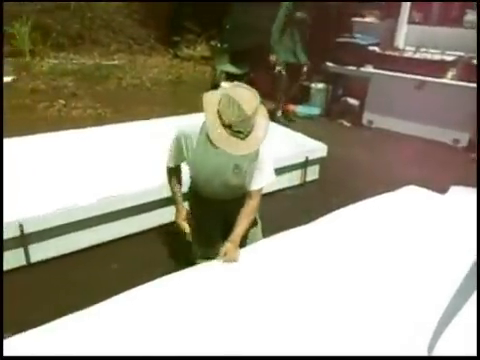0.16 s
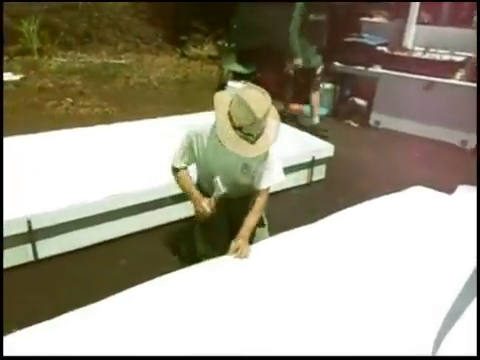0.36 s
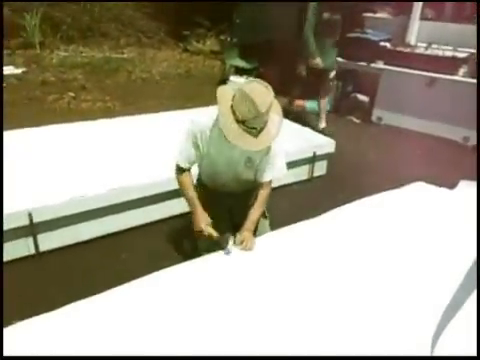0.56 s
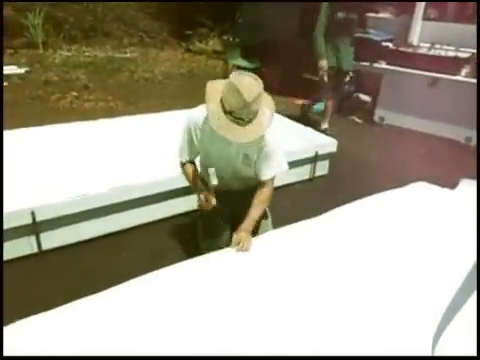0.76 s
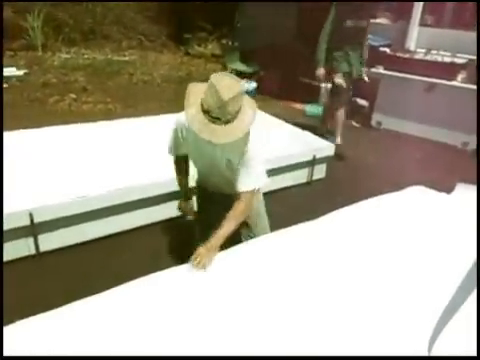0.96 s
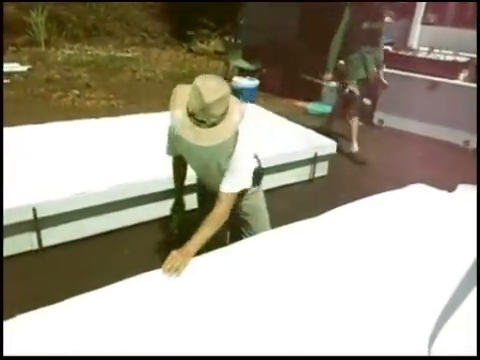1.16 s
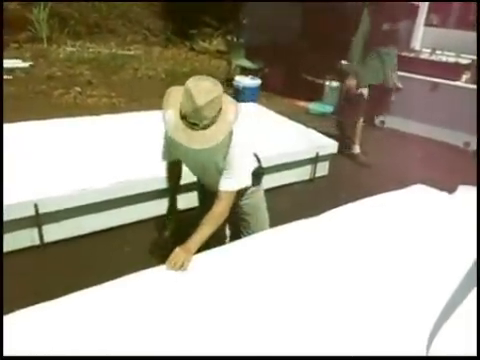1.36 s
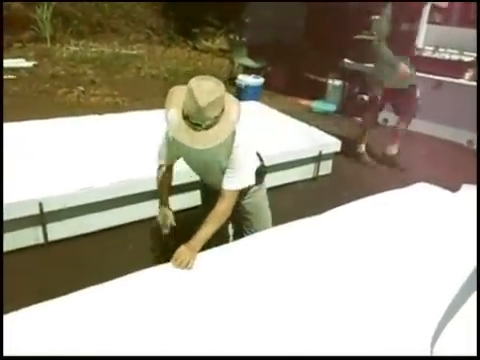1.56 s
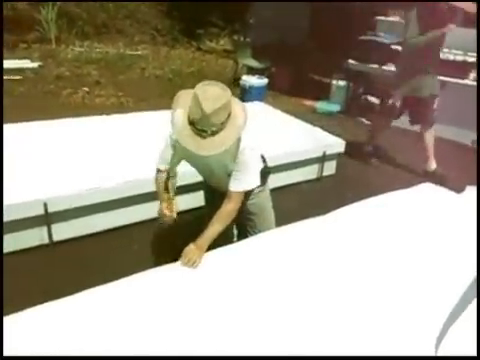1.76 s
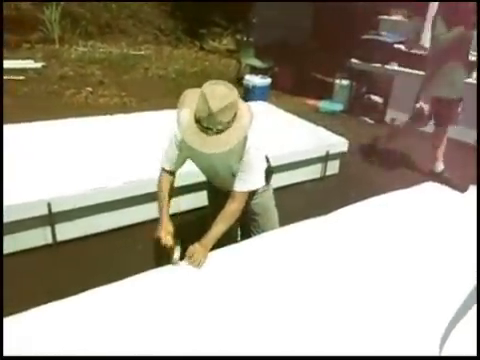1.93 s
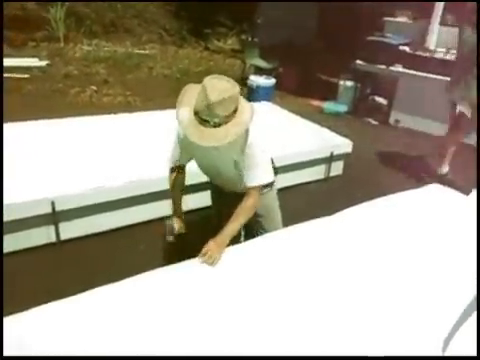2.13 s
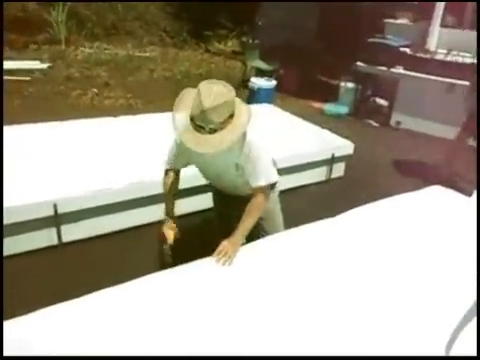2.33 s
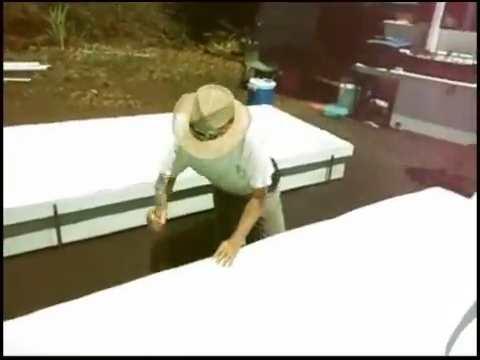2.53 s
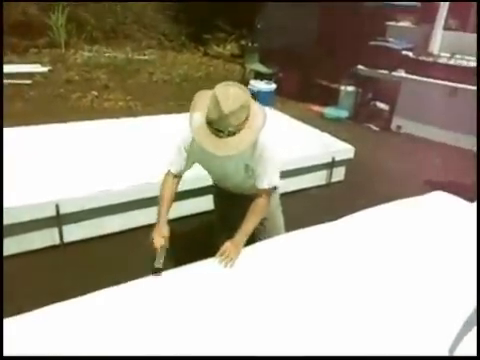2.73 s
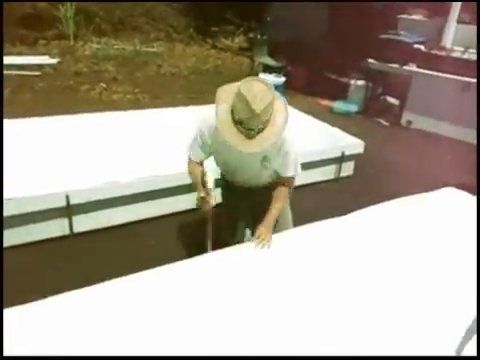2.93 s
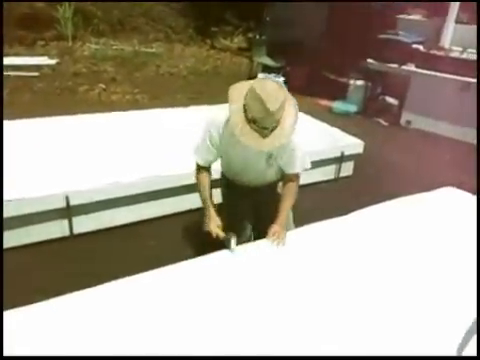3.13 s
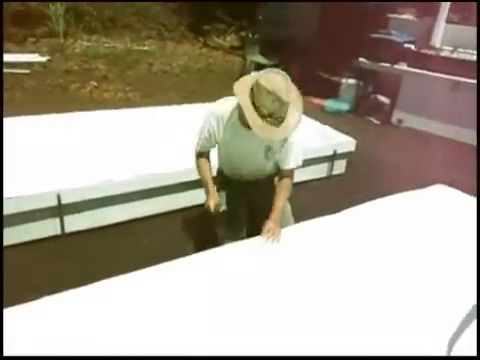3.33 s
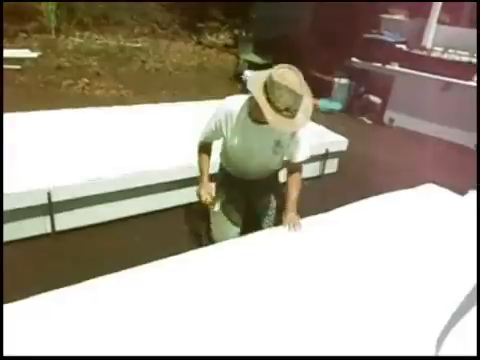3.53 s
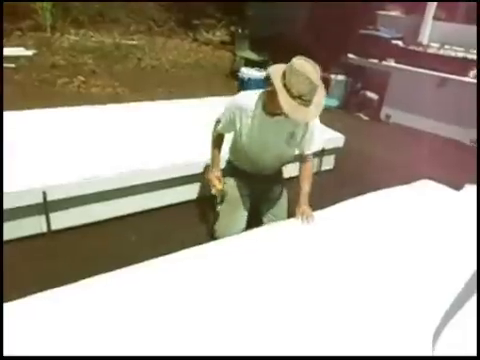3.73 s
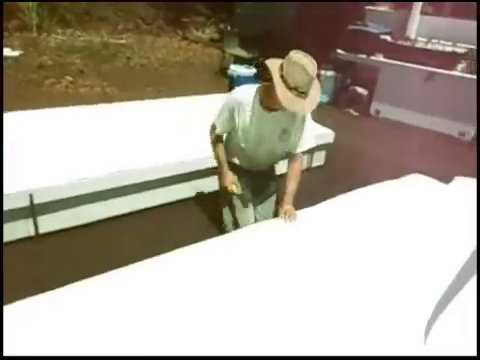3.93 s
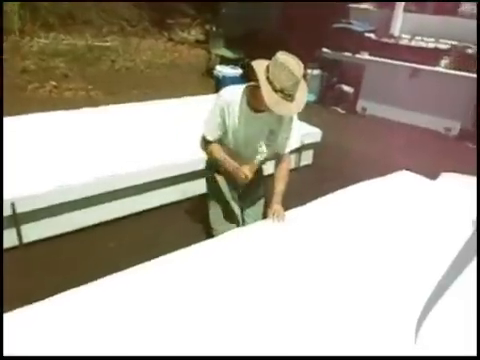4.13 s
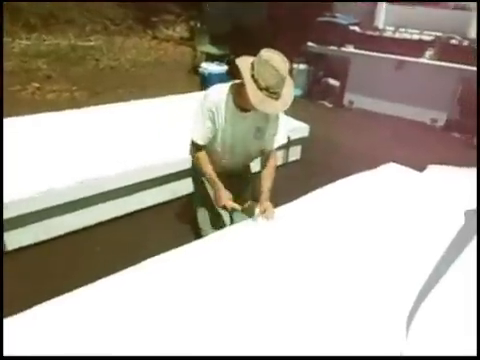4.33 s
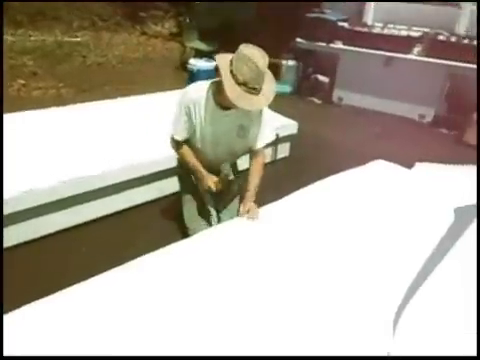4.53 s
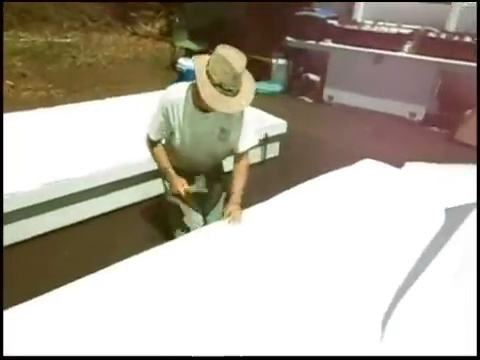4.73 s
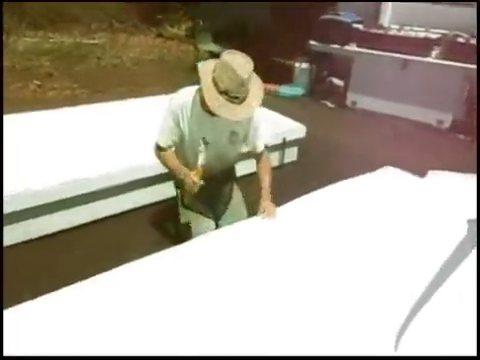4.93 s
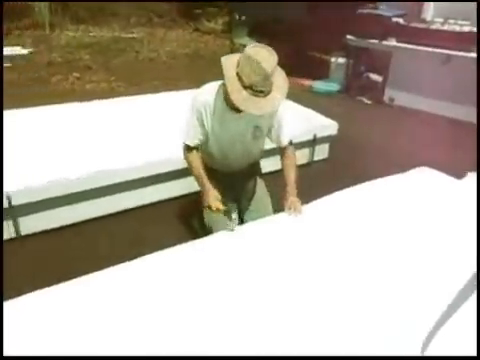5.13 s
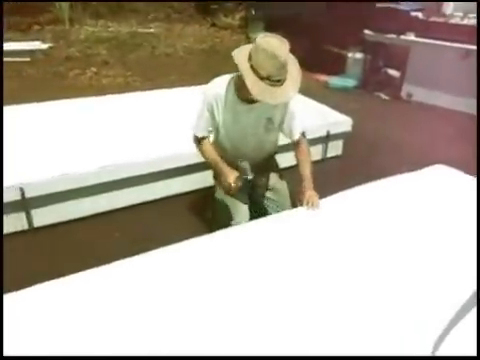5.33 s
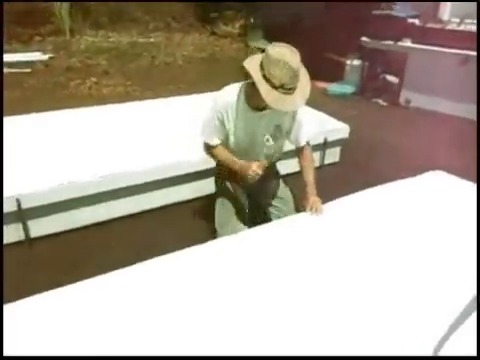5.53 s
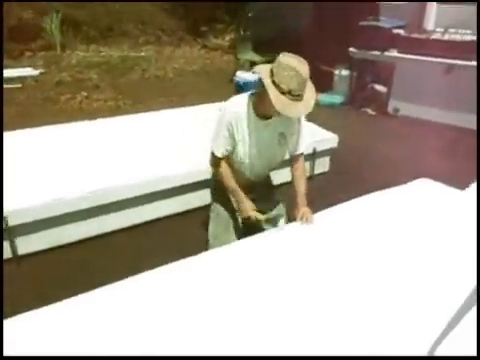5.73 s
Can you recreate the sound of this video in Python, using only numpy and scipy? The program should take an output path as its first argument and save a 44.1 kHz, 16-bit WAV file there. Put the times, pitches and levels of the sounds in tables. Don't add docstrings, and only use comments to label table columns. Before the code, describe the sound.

Outdoors in a yard, wind thumps and rumbles on a small microphone. A hammer tacker strikes plastic-covered wood six times at uneven gaps; each hard crack carries a woody ring, a hollow boom and loose metal clatter. Staples rattle faintly between blows and the sheet briefly rustles.

```python
import sys
import numpy as np
from scipy import signal
from scipy.fft import rfft, irfft
from scipy.io import wavfile
from scipy.ndimage import uniform_filter1d

SR = 44100
rng = np.random.default_rng(int(sys.argv[2]) if len(sys.argv) > 2 else 0)


def field_ratio(decibels):
    return 10 ** (np.asarray(decibels, dtype=float) / 20)


def dump_mix(stems):
    frames = np.atleast_2d(stems).T
    limited = np.clip(frames, -1, 1)
    pcm = np.round(limited * 32767).astype(np.int16)
    wavfile.write(sys.argv[1], SR, pcm)


N = 254898

# (time [s], level [dB])
YARD_LEVEL = [(0.0, -60), (0.71, -50), (0.82, -59), (1.24, -64), (1.64, -65), (2.14, -52), (2.49, -66.5),
              (2.74, -67), (2.91, -59.5), (3.25, -54), (4.3, -62.5), (4.59, -54), (4.8, -57.5), (5.23, -51),
              (5.34, -61), (5.78, -57.5)]
# (time [s], level [dB])
TRAFFIC_LEVEL = [(0, -54), (.5, -51.5), (1.2, -62.5), (2, -52.5), (2.6, -65), (3.3, -58), (4.0, -58.5),
                 (4.8, -56.5), (5.45, -63), (5.78, -59.5)]
# (frequency [Hz], level [dB])
FIZZ_SPECTRUM = [(820, -36), (1400, -5.5), (1910, -4), (3080, -3.5), (3410, -4.5), (3990, -1.5),
                 (4520, -4.5), (6070, -12), (7200, -25), (9360, -61.5), (15800, -120)]
# (frequency [Hz], level [dB])
MURK_SPECTRUM = [(240, -40.5), (400, -7), (491, -5.5), (1150, -11.5), (1400, -19.5), (1820, -52.5),
                 (3080, -120)]
# (frequency [Hz], level [dB])
DRONE_SPECTRUM = [(49, -30), (131, -10.5), (200, -2), (274, -11.5), (351, 0), (450, -14.5), (600, -46.5),
                  (990, -120)]
# (time [s], level [dB])
BREEZE_LEVEL = [(0.0, -53), (0.11, -49), (0.46, -36), (0.8, -42), (1.05, -44), (1.4, -45), (1.55, -37),
                (1.8, -33.5), (2.3, -38), (2.75, -36.5), (3.05, -46.5), (3.45, -37), (3.65, -57.5),
                (4.4, -67.5), (4.55, -40), (4.86, -55), (4.98, -35.5), (5.45, -55)]
# (frequency [Hz], level [dB])
RUMBLE_SPECTRUM = [(18, -72.5), (30, -58.5), (114, 12.5), (173, 3.5), (205, -0.5), (243, 6.5), (284, 0.5),
                   (352, -2.5), (596, -19.5), (900, -31.5), (1170, -60.5), (1980, -120)]
# (frequency [Hz], level [dB])
FLUTTER_SPECTRUM = [(250, -30.5), (400, -4), (520, -1.5), (750, -9.5), (1000, -28), (1500, -73.5)]
# (time [s], level [dB], centre [Hz], length [ms])
SLAPS = [(0.079, -16.5, 212, 11), (0.097, -11.5, 193, 20), (0.42, -8, 282.4, 3.7), (0.441, -8, 273.8, 4),
         (0.523, -11, 205, 11), (0.612, -6.5, 269.5, 5.1), (0.772, -12.5, 201.6, 7.7),
         (0.957, -5, 260.6, 1.9), (1.447, -20.5, 170.8, 15), (1.498, -14, 210, 11), (1.583, -18, 216.5, 23),
         (1.63, -7.5, 246, 2.4), (1.664, -19.5, 334, 7.4), (1.78, -6.5, 272.8, 11),
         (1.844, -14.5, 296.5, 16), (1.872, -6.5, 342, 1.8), (1.933, -5.5, 223.6, 6.1),
         (2.132, -15.5, 220.6, 45), (2.153, -11.5, 328, 9), (2.351, -14.5, 248.3, 7.7),
         (2.372, -18, 260.4, 28), (2.446, -14, 306, 6.5), (2.484, -11, 256, 5.1), (2.549, -15, 225.6, 5.6),
         (2.698, -8.5, 251.8, 5.5), (2.738, -26, 337, 5.6), (2.889, -13.5, 205, 6.9),
         (3.031, -10.5, 211.3, 5.3), (3.5, -13, 219.7, 12), (5.242, -8.5, 216, 7.4)]
# (time [s], level [dB], centre [Hz], length [ms])
PUFFS = [(0.143, -16, 205, 7.1), (0.204, -16.5, 198, 9.1), (0.274, -19, 137.6, 12),
         (0.975, -10.5, 235.2, 13), (1.131, -16.5, 204, 6.3), (1.208, -13, 185.5, 14),
         (1.256, -20.5, 200.5, 12), (1.343, -22.5, 310, 6.6), (1.526, -17, 249, 22),
         (2.191, -9, 221.4, 8.7), (2.213, -4, 197.2, 6.5), (2.609, -16.5, 192.5, 10),
         (2.669, -18.5, 224.6, 45), (2.851, -16, 219.3, 19), (3.142, -8, 205, 4.8),
         (3.217, -38.5, 195, 2.5), (3.301, -22, 258.6, 36), (3.393, -22.5, 244, 29),
         (3.476, -16.5, 231, 18), (3.564, -18.5, 170.7, 3.7), (4.506, -14, 239.2, 16),
         (4.657, -23.5, 170.8, 37), (4.683, -3.5, 206.3, 5.6), (4.758, -17.5, 177, 3.5),
         (4.959, -11.5, 198, 4.8), (4.988, -13.5, 175.7, 5.8), (5.013, -18, 237.4, 11.7),
         (5.408, -28.5, 150.2, 25), (5.665, -21, 223.7, 4.4), (5.725, -25, 266, 6.3)]
# (start [s], end [s], level [dB])
DRAGS = [
    (5.06, 5.133, -34),
    (5.125, 5.168, -42.5),
    (5.045, 5.064, -43),
    (4.64, 4.7, -50.5),
    (5.64, 5.7, -66),
    (2.72, 2.77, -52),
    (4.405, 4.431, -45),
    (1.955, 1.982, -51.5),
]
# (time [s], peak [dB], low steel mode [dB])
STAPLE_RATTLES = [(0.5236, -45, -9), (0.9866, -56.5, -1), (1.0439, -47.5, -4), (1.205, -58, -27),
                  (1.6756, -53.5, -3), (1.8662, -41.5, -22), (2.3295, -49.5, -2), (2.3838, -58, 2),
                  (2.6527, -53, -7), (2.9732, -43.5, -3.5), (3.0969, -40, -18), (3.128, -46, -0.5),
                  (3.631, -53.5, -5), (3.7068, -54.5, 8.5), (4.1071, -57, 3), (4.3116, -46, -17),
                  (4.3615, -49.5, -15), (4.715, -46.5, -4), (4.767, -48, 5.5), (5.3512, -47, -22),
                  (5.494, -52.5, -12.5), (5.663, -57.5, 14.5)]
# (frequency [Hz], level [dB], t60 [s])
CHANNEL_MODES = [(2760, 8.5, 0.014), (3700, 2, .01), (4730, 12, 0.0073), (4940, -1.5, 0.039),
                 (6000, -4, 0.034)]
# (time [s], clatter [dB], loudest rattle [Hz], rise [s], tick [dB])
REBOUNDS = [
    (0.695, -24.5, 3030, 0.023, -86),
    (2.041, -28.5, 2600, 0.059, -66),
    (2.836, -38, 2690, 0.0055, -40),
    (3.295, -32, 1920, 0.013, -44),
    (4.497, -30.5, 3060, 0.0025, -33),
    (5.228, -28.5, 2810, 0.0016, -31.5),
]
# (frequency [Hz], level [dB])
CLATTER_SPECTRUM = [(350, -34), (600, -11.5), (938, -12.5), (1180, -6.5), (1320, -10.5), (2770, -7),
                    (4900, -24), (7200, -36.5), (9360, -77.5), (15800, -120)]
# (time [s], crack [dB]; relative to a usual blow: wood knock [dB], steel snap [dB], lingering buzz [dB])
BLOWS = [
    (.6459, -18, -8.5, 0, 7),
    (1.9807, -18.5, -4, 3, 4),
    (2.7665, -21.5, -1, 5, 6.5),
    (3.2399, -22.5, -1, 6, 4),
    (4.4293, -21.5, -3, 3.5, 10),
    (5.166, -18.5, -4, 2, 4),
]
# (frequency [Hz], level [dB])
SNAP_SPECTRUM = [(290, -23.5), (500, 3.5), (578, 8), (1150, 3.5), (2060, -5.5), (2410, 1), (2730, -4),
                 (4310, -9.5), (6090, -18), (7200, -24.5), (9360, -52.5), (15800, -120)]
# (frequency [Hz], level [dB], t60 [s])
PLANK_MODES = [(647, -25.5, 0.2), (840, 7.5, 0.1), (1127, 7.5, 0.07), (1285, 6.5, 0.069),
               (1700, 0.5, 0.087), (1830, -2, 0.053), (2570, -1, 0.066)]
# (frequency [Hz], level [dB], t60 [s])
HOLLOW_MODES = [(291, -4, 0.18), (318.3, 4, 0.1), (205, -5.5, 0.27), (145, -11, 0.38), (438, -14, 0.2)]


def evened(x):
    return x / np.sqrt(np.mean(x ** 2) + 1e-20)


def read(points, hz):
    point_hz, value = np.transpose(points)
    return np.interp(np.log(hz + 1), np.log(point_hz + 1), value)


def level_at(points, t_s):
    return np.interp(t_s, *np.transpose(points))


def add(mix, start_s, sound):
    part = mix[max(round(start_s * SR), 0):][:len(sound)]
    part += sound[:len(part)]


def lumps(count, depth_db, size):
    slow = uniform_filter1d(rng.standard_normal(count), size=size)
    return field_ratio(depth_db * evened(uniform_filter1d(slow, size=size)))


def rings(modes, t, spread=0.099):
    out = np.zeros(len(t))
    for hz, db, t60_s in modes:
        decay = field_ratio(db + 1.2 * rng.standard_normal() - 60 * t / t60_s)
        out += decay * np.sin(2 * np.pi * hz * rng.uniform(1 - spread, 1 + spread) * t)
    return out


def coloured(x, colour, knock_db, snap_db, lag):
    hz = np.fft.rfftfreq(len(x), 1 / SR)
    gain = field_ratio(read(colour, hz))
    tilt_db = read([(1300, knock_db), (2100, 0.024), (3100, 0.0016), (4300, snap_db)], hz)
    gain = gain / np.sqrt(np.mean(gain ** 2)) * field_ratio(tilt_db)
    return irfft(rfft(x) * gain * np.exp(-2j * np.pi * lag * np.log(hz + 1)), len(x))


def airy(colour, patchy_db):
    hz = np.fft.rfftfreq(1024, 1 / SR)
    a, b, patches = rng.standard_normal((N // 256 + 5, len(hz), 3)).T
    patches = uniform_filter1d(patches, size=14, axis=0)
    patches = evened(uniform_filter1d(patches, size=10, axis=1))
    field = field_ratio(read(colour, hz)[:, None] + patchy_db * patches)
    return evened(signal.istft((a + 1j * b) * field, nperseg=1024, noverlap=768)[1][:N])


def yard():
    t = np.arange(N) / SR
    fizz = airy(FIZZ_SPECTRUM, patchy_db=1.3) * field_ratio(level_at(YARD_LEVEL, t) + 0.17)
    murk = airy(MURK_SPECTRUM, patchy_db=1.2) * field_ratio(level_at(TRAFFIC_LEVEL, t))
    drone = airy(DRONE_SPECTRUM, patchy_db=1.5) * field_ratio(-58.5)
    return fizz + murk + drone


def wind():
    breeze_db = level_at(BREEZE_LEVEL, np.arange(N) / SR)
    low = airy(RUMBLE_SPECTRUM, patchy_db=4.0) * field_ratio(breeze_db + 5.0)
    low *= lumps(N, depth_db=0.35, size=400)
    flutter_db = -51.5 + 3.3 * (breeze_db + 33.5)
    flutter = airy(FLUTTER_SPECTRUM, patchy_db=4.0) * field_ratio(flutter_db)
    return low + flutter * lumps(N, depth_db=8.0, size=250)


def small_eddies():
    gap_s, front_db = 0.03, -16.0
    grid_s = np.arange(.05, N / SR, gap_s)
    slip, size, pitch, length = rng.standard_normal((len(grid_s), 4)).T
    start_s = grid_s + 0.27 * gap_s * slip
    db = level_at(BREEZE_LEVEL, grid_s) + 11 + 5.5 * size
    hz = 214.34 * np.exp(0.1 * pitch)
    length_ms = 23 * np.exp(0.2 * length)
    return [row + (front_db,) for row in zip(start_s, db, hz, length_ms)]


def eddy(start_s, db, hz, length_ms, front_db):
    t = np.arange(-1764, 1764) / SR
    width_s = 0.31 * length_ms / 1000
    sag = 0.84 + np.minimum(0.14 * np.exp(-t / 0.003), .6)
    turns = np.cumsum(hz * sag) / SR + rng.random()
    side_s = np.where(t < 0, 1.09 * width_s, 1.66 * width_s)
    body = np.exp(-.5 * (t / side_s) ** 2) * np.cos(2 * np.pi * turns)
    front = np.exp(-.5 * ((t + 0.0018) / 0.00087) ** 2) * np.cos(2 * np.pi * (389.0 * t + rng.random()))
    return start_s - .04, field_ratio(db - 5.5) * (body + field_ratio(front_db + 4.5) * front) * np.hanning(len(t)) ** .5


def drag(start_s, end_s, db):
    n = round((end_s - start_s) * SR)
    swell = np.linspace(.3, 1, n) ** 2 * signal.windows.tukey(n, .25) * lumps(n, depth_db=1.2, size=40)
    crackle = coloured(rng.standard_normal(n), CLATTER_SPECTRUM, 2.2, 9.6, lag=0)
    return start_s, field_ratio(db) * crackle * swell


def rattle(start_s, db, low_db):
    t = np.arange(1500) / SR
    knocks = rng.standard_normal(500) * (rng.random(500) < .12) * np.exp(-np.arange(500) / 400.0)
    knocks[0] = 1.4
    knocks /= np.linalg.norm(knocks)
    (hz, mode_db, t60_s), *high = CHANNEL_MODES
    ring = signal.fftconvolve(knocks, rings([(hz, mode_db + low_db, t60_s)] + list(high), t))
    scuff = coloured(np.pad(knocks, (0, len(t) - 1)), FIZZ_SPECTRUM, -27.5, 0, lag=0)
    return start_s - .0006, field_ratio(db - 4) * (1.33 * ring + 3.2 * scuff)


def rebound(start_s, db, rattle_hz, rise_s, tick_db):
    t = np.arange(SR // 3) / SR
    swell = np.minimum(t / rise_s, 1) * (field_ratio(-60 * t / 0.099) + field_ratio(-23.5 - 60 * t / .5))
    grains = rng.standard_normal(len(t)) * swell * lumps(len(t), depth_db=1.5, size=30)
    part = rings([(rattle_hz, -7, .013), (1.2 * rattle_hz, -10, .011)], t[:800])
    knocks = grains * (rng.random(len(t)) < .03) * 4
    clatter = coloured(grains, CLATTER_SPECTRUM, 0, 10.5, lag=1.2)
    clatter += signal.fftconvolve(knocks, part)[:len(t)]
    return start_s - .0005, field_ratio(db) * clatter * np.clip(20 * (t[-1] - t) - .5, 0, 1)


def blow(start_s, db, knock_db, snap_db, buzz_db):
    t = np.arange(SR // 2) / SR
    fall = field_ratio(-60 * t / 0.089) + field_ratio(buzz_db - 25.0 - 60 * t / .5)
    fall *= lumps(len(t), depth_db=2.0, size=100)
    out = 2.09 * coloured(rng.standard_normal(len(t)) * fall, SNAP_SPECTRUM, knock_db, snap_db, lag=1.8)
    click = 1. * (t == 0)
    out += field_ratio(16.5) * coloured(click, CLATTER_SPECTRUM, knock_db, snap_db, lag=5.0)

    push = rng.standard_normal(400) * np.exp(-np.arange(400) / 34.0)
    push /= np.linalg.norm(push)
    plank = signal.fftconvolve(rings(PLANK_MODES, t, spread=.025), push)[:len(t)]
    add(out, .003, field_ratio(knock_db - 2.0) * plank)

    boom = rings(HOLLOW_MODES, t, spread=0.018) * (1 - np.exp(-t / 0.0036))
    boom *= lumps(len(t), depth_db=3.43, size=300)
    boom_db = -9.5 + 0.12 * (db + 20)
    add(out, .007, field_ratio(boom_db - db) * boom)
    return start_s - .0002, field_ratio(db) * out * np.clip(20 * (t[-1] - t) - .5, 0, 1)


def scene():
    mix = yard() + wind()
    slap_front_db, puff_front_db = -10.5, -28.5
    eddies = [tuple(row) + (slap_front_db,) for row in SLAPS]
    eddies += [tuple(row) + (puff_front_db,) for row in PUFFS]
    eddies += small_eddies()
    layers = ((eddies, eddy), (DRAGS, drag), (STAPLE_RATTLES, rattle), (REBOUNDS, rebound), (BLOWS, blow))
    for rows, source in layers:
        for row in rows:
            add(mix, *source(*row))
    return mix[None]


def roll_off(x):
    return signal.sosfilt(signal.butter(12, 12300, fs=SR, output="sos"), x)


def record(dry):
    hz = np.fft.rfftfreq(N, 1 / SR)
    squeezed = .75 * np.tanh(dry / .75)
    response_db = read([(40, -30), (110, -4.0), (5300, 0.5), (5600, -5.0), (5900, 1), (6950, -4.5),
                        (7250, -14.5), (7450, -65.5)], hz)
    cut = irfft(rfft(squeezed) * field_ratio(response_db), N)

    excess = np.maximum(abs(cut - uniform_filter1d(cut, size=30)) - .06, 0)
    leak = field_ratio(-42.0) * excess * rng.standard_normal(N)
    for start_s, *_, tick_db in REBOUNDS:
        add(leak[0], start_s + 0.0013, field_ratio(tick_db) * np.ones(1))
    leak_db = read([(6600, -24.0), (7400, 10.0), (11700, 2.5), (12300, -61.5)], hz)
    leak = irfft(rfft(leak) * field_ratio(leak_db), N)

    wander = -.0002 + field_ratio(-75) * airy([(20, 5.5), (45, 0.5), (90, -27), (200, -89)], patchy_db=-3.3)
    return roll_off(cut + leak + wander)


dry = scene()
out = record(dry)
dump_mix(out)
```